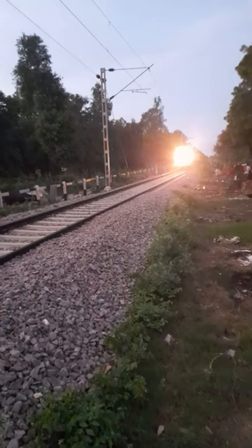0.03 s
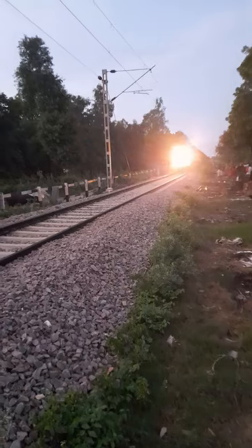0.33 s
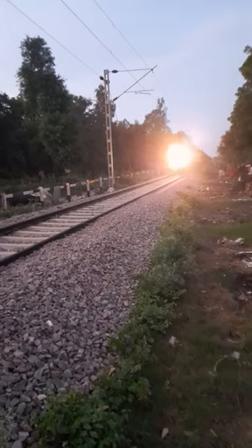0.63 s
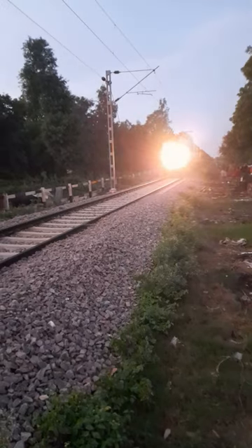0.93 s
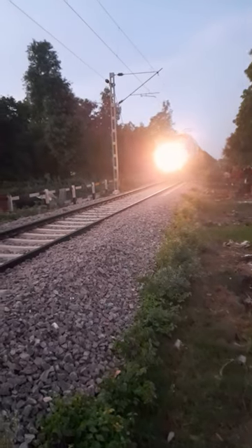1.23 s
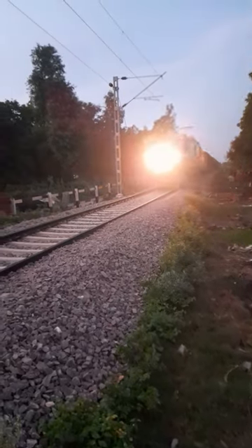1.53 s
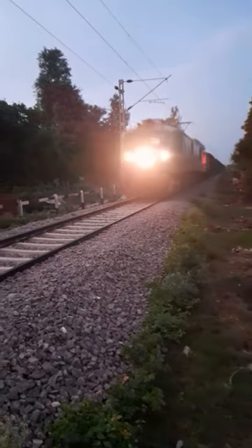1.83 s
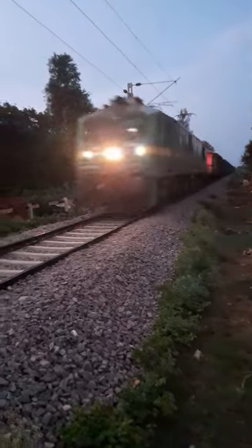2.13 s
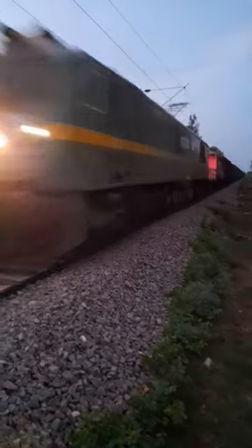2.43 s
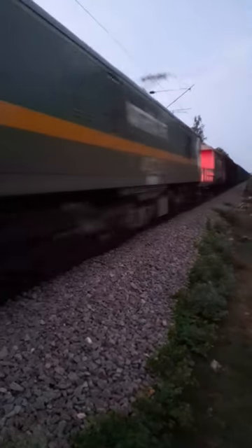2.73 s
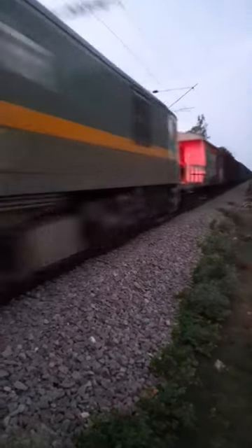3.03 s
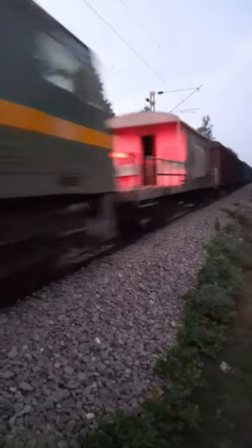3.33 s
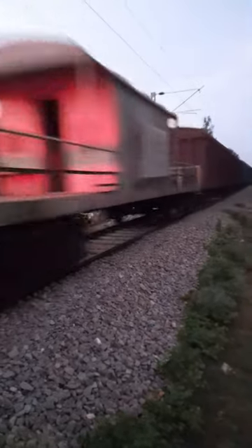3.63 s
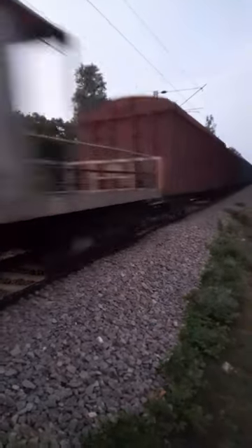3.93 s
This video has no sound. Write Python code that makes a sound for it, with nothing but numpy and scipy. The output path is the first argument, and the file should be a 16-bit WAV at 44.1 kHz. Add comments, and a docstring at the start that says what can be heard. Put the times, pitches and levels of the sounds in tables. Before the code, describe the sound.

A freight train approaches and passes close by, with rumbling, roaring wheels and pinging rails.

```python
"""Beside a straight railway track, an electric freight train comes up and passes a few metres away.
The ground rumbles and throbs first. Then the wheels roar on the rails, and the motors and gears of the
locomotive drone, dropping in pitch as it goes by. The rails ping and sing ahead of the train, a wheel
squeals, and steel scrapes on steel, loudest as the first wagon arrives.
A phone picks it all up through two microphone openings, left and right."""
import sys
import numpy as np
from scipy import signal
from scipy.fft import rfft, irfft
from scipy.io import wavfile
from scipy.ndimage import uniform_filter1d, map_coordinates

SR = 44100
rng = np.random.default_rng(int(sys.argv[2]) if len(sys.argv) > 2 else 0)


def bounce(signal):
    """Save signal as a 16-bit WAV file at the path given by the first command-line argument."""
    frames = np.transpose(np.atleast_2d(signal))
    limited = np.clip(frames, -1, 1)
    pcm = np.round(limited * 32767).astype(np.int16)
    wavfile.write(sys.argv[1], SR, pcm)


N = 176400
T = np.arange(N) / SR
HZ = np.fft.rfftfreq(N, 1 / SR)
NEAR_S, NEAR_SPAN_S = 2.4, 1  # when and how slowly the far sound turns into the near sound

# how the rumble of the ground throbs (time [s], level [dB])
GROUND_LEVEL = [(0.1, -22.5), (0.18, -29.5), (0.26, -31), (0.33, -21.5), (0.41, -35), (0.56, -25),
                (0.6, -32), (0.67, -21), (0.73, -16.5), (0.8, -31), (0.86, -22.5), (1.04, -32.5),
                (1.16, -24.5), (1.25, -27), (1.39, -24), (1.6, -28.5), (1.78, -26.5), (1.86, -26.5),
                (2.03, -28), (2.15, -37), (2.23, -25.5), (2.33, -37), (2.55, -32), (2.85, -30),
                (3.2, -32.5), (3.68, -29.5), (4, -33)]
# how strongly the rails ring (time [s], level [dB])
RAIL_LEVEL = [(0.1, -36.5), (0.38, -34.5), (0.6, -29.5), (1.0, -30), (1.6, -27.5), (2.15, -30),
              (2.7, -28.5), (3.05, -26), (3.3, -30), (3.55, -26.5), (4, -31)]


def amp(db):
    """Turns decibels into a number to multiply by."""
    return 10 ** (np.asarray(db) / 20)


def unit(x):
    """Scales a signal to an average strength (rms) of 1."""
    return x / np.sqrt(np.mean(abs(x) ** 2) + 1e-20)


def spectrum(points):
    """Joins (frequency, value) points into a line over all frequencies, with octaves evenly spaced."""
    hz, value = np.transpose(points)
    return np.interp(np.log(HZ + 1), np.log(hz + 1), value)


def peaks(modes):
    """Makes a narrow peak or dip, in dB, around each listed frequency."""
    return sum(db / (1 + (2 * (HZ - hz) / width_hz) ** 2) for hz, width_hz, db in modes)


def curve(points):
    """Joins (time, value) points into a line over the whole sound."""
    return np.interp(T, *np.transpose(points))


def turn(at_s, span_s):
    """Glides from 0 to 1 around a moment."""
    return .5 + .5 * np.tanh((T - at_s) / span_s)


def arch(start, length):
    """One smooth swell from 0 to 1 and back."""
    return np.sin(np.pi * np.clip((T - start) / length, 0, 1))


def wander(rate_hz):
    """A smooth random wobble; its real and imaginary parts move independently."""
    keep_slow = np.exp(-.5 * (np.fft.fftfreq(N, 1 / SR) / rate_hz) ** 2)
    noise = rng.standard_normal(N) + 1j * rng.standard_normal(N)
    return unit(np.fft.ifft(np.fft.fft(noise) * keep_slow))


def stereo_noise():
    """White noise for left and right, alike in the bass and mostly different in the treble."""
    # how alike the two sides are (frequency [Hz], likeness [0-1])
    likeness = [(60, .98), (150, .94), (400, .83), (950, .7), (2000, .3), (5000, .22), (15000, .25)]
    same = spectrum(likeness)
    a, b = rfft(rng.standard_normal((2, N)))
    mid, side = a * np.sqrt(1 + same), b * np.sqrt(1 - same)
    return unit(irfft([mid + side, mid - side], N))


def colour(x, db):
    """Turns each frequency up or down by db, then scales the result to strength 1."""
    return unit(irfft(rfft(x) * amp(db), N))


def steadied(x):
    """Takes the slow swells out of a noise."""
    return x / np.sqrt(uniform_filter1d((x ** 2).mean(0), 2600) + 1e-12)


def wheel_contact():
    """Wheels touch the rail unevenly: noise with louder and softer patches and a faint flicker."""
    patchy_db, flicker_db = 1.31, -0.13
    grid = signal.stft(stereo_noise(), nperseg=512, noverlap=384)[2]  # side, frequency, time
    patches = uniform_filter1d(rng.standard_normal(grid.shape[1:]), size=6, axis=0)
    patches = unit(uniform_filter1d(patches, size=14, axis=1))
    flicker = unit(uniform_filter1d(rng.standard_normal(grid.shape[2]), size=4))
    grid = grid * amp(patchy_db * patches + flicker_db * flicker)
    return signal.istft(grid, nperseg=512, noverlap=384)[1][:, :N]


def rolling():
    """Rolling wheels shake the ground, their frames and the rails; the tone shifts as they come near."""
    # boom of the wheel frames (time [s], level [dB])
    boom_level = [(0.1, -29.5), (0.36, -32.5), (0.55, -26.5), (0.75, -26), (0.79, -29), (1.08, -27),
                  (1.14, -23.5), (1.33, -22.5), (1.85, -21), (2.05, -26), (2.5, -20.5), (2.8, -19),
                  (2.92, -18), (3.03, -15.5), (3.15, -18), (3.23, -19.5), (3.36, -21.5), (3.48, -16),
                  (3.75, -19.5), (3.92, -18.5), (3.98, -22.5)]
    # roar of the wheels (time [s], level [dB])
    roar_level = [(0.1, -36.5), (0.351, -34), (1.24, -25.5), (1.7, -19.5), (1.82, -21.5), (2.24, -17.5),
                  (2.5, -19.5), (2.7, -13.5), (2.78, -18.5), (3.0, -14), (3.09, -13.5), (3.15, -18.5),
                  (3.24, -18.5), (3.4, -15.5), (3.58, -15.5), (3.75, -21.5), (3.98, -21)]
    # high rushing sound (time [s], level [dB])
    rush_level = [(0.1, -41), (0.4, -39), (0.8, -37.5), (1.5, -34), (2.0, -32.5), (2.4, -32), (2.7, -29),
                  (3.02, -26.5), (3.25, -30), (3.45, -23.5), (3.65, -25), (3.8, -28), (4, -28.5)]
    # tone of the train far away (frequency [Hz], relative level [dB])
    far_tone = [(20, -41), (35, -12), (48, 7), (60, 10), (80, -7.5), (120, -6.5), (175, -7.5), (240, -0.5),
                (320, -13), (410, -9), (470, -4.5), (520, -18.5), (600, -5.5), (670, -6.5), (800, -11.5),
                (960, -13), (1400, -20.5), (1650, -32.5), (2600, -28.5), (3600, -36), (4700, -35),
                (6500, -46.5), (8500, -49.5), (9700, -64.5), (11500, -54), (15000, -66)]
    # tone of the train alongside (frequency [Hz], relative level [dB])
    near_tone = [(20, -37), (35, -22), (55, -1), (85, -11), (130, -3.5), (170, -3.5), (230, 0), (280, -5.5),
                 (470, 9.5), (550, 2.5), (640, 8), (770, -5), (950, -6.5), (1350, -13), (1700, -18),
                 (2500, -13.5), (3300, -23), (4600, -22.5), (6500, -36), (8500, -38.5), (9900, -53),
                 (11500, -47), (15000, -50)]
    # narrow peaks and dips of rails and wheels (frequency [Hz], width [Hz], boost [dB])
    resonances = [(120, 10, 5.5), (181, 19, -3), (324, 33, 1), (766, 44, 6.5), (958, 29, -12),
                  (995, 38, 4.5), (1071, 85, -4.5), (1312, 49, 3.5), (1830, 62, 3), (2012, 33, 5),
                  (2200, 40, 4.5), (2370, 25, -2.5), (3020, 18, 4), (3300, 22, 5.5), (3880, 12, 6),
                  (5170, 34, 2.5)]
    # borders between the five bands: ground, boom, roar, rails, rush (frequency [Hz])
    band_edges = [90, 300, 900, 1600]
    # added to the level of each band (gain [dB])
    band_gains = [-1.25, -1.2, -1.58, -1.34, -0.91]
    contact, near = wheel_contact(), turn(NEAR_S, NEAR_SPAN_S)
    ringing_db = peaks(resonances)
    below = [0] + [1 / (1 + (HZ / edge) ** 16) for edge in band_edges] + [1]
    out = 0
    for k, level in enumerate([GROUND_LEVEL, boom_level, roar_level, RAIL_LEVEL, rush_level]):
        band_db = 10 * np.log10(abs(below[k + 1] - below[k]) + 1e-12) + ringing_db
        far_sound = colour(contact, band_db + spectrum(far_tone))
        near_sound = colour(contact, band_db + spectrum(near_tone))
        blend = steadied((1 - near) * far_sound + near * near_sound)
        out = out + blend * amp(curve(level) + band_gains[k])
    return out


def ground_hum():
    """The ground carries the far locomotive's low note; it throbs, then fades as the train arrives."""
    hum_hz, waver_hz, over_rumble_db = 59.4, 2.99, -4
    pitch = hum_hz + waver_hz * unit(wander(6.04).real)
    cycles = np.cumsum(pitch) / SR + rng.random()
    far = 1 - turn(NEAR_S, NEAR_SPAN_S)
    return unit(np.sin(2 * np.pi * cycles)) * amp(curve(GROUND_LEVEL) + over_rumble_db) * far


def rail_singing():
    """The rail's own high notes ring in short bursts, wavering differently on the left and right."""
    # notes the rail rings at (pitch [Hz], relative level [dB])
    rail_notes = [(4247, -6), (6901, -11), (8280, -4), (8380, -13), (10400, -21), (12030, -19),
                  (14400, -14)]
    # bursts of singing (start [s], length [s], level [dB])
    bursts = [(0.05, 0.21, -46), (0.73, 0.1, -51), (1.22, .06, -55), (1.48, .08, -46), (2.1, 0.16, -55)]
    waver_hz, rest_db = 28, -69
    notes = 0
    for hz, db in rail_notes:
        waver = wander(58)
        pitch = hz + waver_hz * np.array([waver.real, waver.imag])
        cycles = np.cumsum(pitch, axis=1) / SR + rng.random((2, 1))
        notes = notes + amp(db) * np.sin(2 * np.pi * cycles)
    swells = sum(amp(db) * arch(start, length) for start, length, db in bursts)
    return notes * (amp(rest_db) + swells)


def rail_pings():
    """Knocks run through the rail and arrive as short falling chirps, faint ones among the loud ones."""
    # the loud pings (time [s], peak level [dB], pitch before tuning [Hz])
    loud_pings = [(0.166, -20, 1080), (0.589, -19.5, 980), (0.668, -12.5, 1130), (0.679, -19, 1160),
                  (1.271, -18, 1040), (2.0, -12, 690), (2.038, -16, 793), (2.176, -6.5, 700),
                  (2.264, -5.5, 976), (2.271, -13, 1060), (2.316, -13.5, 940), (2.536, -13, 746),
                  (3.067, -19, 780)]
    rise_s, fall_s, overshoot, tuning = 0.0025, 0.0013, 0.49, 0.952
    faint_per_s, over_rails_db = 10, -1.5
    faint_db = curve(RAIL_LEVEL) + over_rails_db
    draws = rng.random((int(faint_per_s * N / SR), 3)) * [T[-1], 1, 1]
    faint_pings = [(start, faint_db[int(start * SR)] + 6 * (size - .5), 750 + 650 * height)
                   for start, size, height in draws]
    t, out = np.arange(SR // 30) / SR, np.zeros(N)
    envelope = (t / rise_s * np.exp(1 - t / rise_s)) ** 2
    for start, db, hz in list(loud_pings) + faint_pings:
        pitch = hz * tuning * (1 + overshoot * np.exp(-t / fall_s))
        ping = envelope * np.sin(2 * np.pi * np.cumsum(pitch) / SR)
        slot = out[round(start * SR):][:len(t)]
        slot += amp(db) * ping[:len(slot)]
    return out


def motor_drone():
    """Rough notes of motors and gears swell, and drop in pitch as they pass (the Doppler effect)."""
    # the notes (loudest at [s], swell time [s], pitch when level with us [Hz], level [dB], rough [0-1])
    motor_notes = [(0.75, 0.086, 237, -28.5, 0.35), (1.4, 1, 636, -34.5, 0.87),
                   (2.31, 0.17, 462, -21.5, 0.51), (2.42, 0.35, 637.5, -21.5, .6),
                   (2.66, 0.21, 233.9, -22, 0.42), (2.67, .1, 325.5, -25.5, 0.2),
                   (2.92, 0.061, 230, -12.5, 0), (3.101, 0.13, 611.7, -22.5, .4),
                   (3.32, 0.13, 657, -21.5, 0.63), (3.42, 0.12, 238, -14.5, 0.21),
                   (3.68, 0.17, 634, -19.5, 0.58)]
    doppler_share, waver_hz, breakup_hz = .035, 3.5, 11.7
    shift = 1 + doppler_share * (1 - 2 * turn(at_s=3.15, span_s=0.3463))
    out = 0
    for at_s, span_s, hz, db, rough in motor_notes:
        pitch = hz * shift + waver_hz * unit(wander(7.05).real)
        cycles = np.cumsum(pitch) / SR + rng.random()
        note = np.exp(2j * np.pi * cycles) * (1 - rough + rough * wander(breakup_hz))
        swell = np.exp(-((T - at_s) / span_s) ** 2)
        out = out + unit(note.real) * amp(db) * swell
    return out


def scrape(strokes, hiss, modes):
    """Steel rubs on steel: a hiss that starts quickly, can make the metal ring, and fades."""
    friction, out = stereo_noise(), 0
    for start, rise, fade, db, ring in strokes:
        attack = np.clip((T - start) / rise, 0, 1)
        decay = amp(db - fade * np.maximum(T - start - rise, 0))
        out = out + attack * decay * colour(friction, spectrum(hiss) + ring * peaks(modes))
    return out


def far_scrapes():
    """Steel scrapes thinly while the train is still some way off."""
    # the scrapes (start [s], rise [s], fade [dB per s], level [dB], ring [0-1])
    strokes = [(1.536, 0.011, 150, -35, 1), (1.61, 0.08, 24, -48, 0), (1.692, .01, 130, -41, .8),
               (1.76, .08, 90, -47.5, 0)]
    # tone of their hiss (frequency [Hz], relative level [dB])
    hiss = [(100, -29), (3000, -10), (5500, 6), (6600, 0.5), (7500, 0.5), (9000, 1), (10000, -11),
            (11300, 3), (14000, -3.5), (15500, -11)]
    # where the steel rings (frequency [Hz], width [Hz], boost [dB])
    steel_notes = [(7450, 500, 10), (8020, 360, 13)]
    return scrape(strokes, hiss, steel_notes)


def wheel_squeal():
    """A wheel gives a short fuzzy whistle, made of a narrow band of noise."""
    # when it squeals (start [s], length [s])
    timing = (1.79, .2)
    pitch_hz, width_hz, level_db = 5300, 560, -39.5
    band_db = -20 * np.log10(1 + (2 * (HZ - pitch_hz) / width_hz) ** 2)
    return amp(level_db) * arch(*timing) * colour(stereo_noise(), band_db)


def flange_scrape():
    """Close by, the lip of a wheel (its flange) scrapes the rail and the wheel rings."""
    # the scrapes (start [s], rise [s], fade [dB per s], level [dB], ring [0-1])
    strokes = [(3.456, 0.006, 100, -19.5, 0.55), (3.472, 0.025, 400, -23.5, 1)]
    # tone of their hiss (frequency [Hz], relative level [dB])
    hiss = [(1000, -20), (2300, 4), (3000, 3.5), (4000, 4), (5500, 0.5), (7000, -8), (8500, -7),
            (10000, -19.5), (11500, -9.5), (14000, -10), (15500, -18)]
    # where the wheel rings (frequency [Hz], width [Hz], boost [dB])
    wheel_notes = [(2250, 70, 5), (2430, 60, 5), (3790, 75, 13), (4260, 70, 5), (5210, 100, 9),
                   (7660, 110, 9), (9500, 150, 5)]
    return scrape(strokes, hiss, wheel_notes)


def scene():
    """All the sounds together, swinging from one side to the other as the train passes."""
    train = rolling() + ground_hum() + rail_singing() + rail_pings() + motor_drone()
    train = train + far_scrapes() + wheel_squeal() + flange_scrape()
    side_delay_ms = 0.13  # the most that one side hears the train before the other
    lag = side_delay_ms * SR / 1000 * (turn(at_s=2.67, span_s=0.34) - .5)
    return np.array([map_coordinates(channel, [np.arange(N) + side * lag], order=5, mode="nearest")
                     for channel, side in zip(train, (-1, 1))])


def record(dry):
    """The microphone colours each side, switches on just after the start and cuts the highest treble."""
    # balance of the two sides (frequency [Hz], left minus right [dB])
    balance = [(30, 0), (60, 0), (130, -0.5), (230, -0.5), (450, -2), (750, -0.4), (1200, -2.3),
               (2400, -3.7), (4200, -4), (6000, 0.5), (7600, 20), (9000, 15), (10800, -2), (14900, 0)]
    on_s, rise_s, top_hz = 0.084, 0.016, 15400
    gains = amp(spectrum(balance) * np.array([[.5], [-.5]]))
    sound = irfft(rfft(dry) * gains / np.sqrt((gains ** 2).mean(0)), N)
    sound = sound * np.clip((T - on_s) / rise_s, 0, 1)
    treble_cut = signal.firwin(511, top_hz, window=("kaiser", 9), fs=SR)
    return signal.oaconvolve(sound, treble_cut[None], "same")


dry = scene()
out = record(dry)
bounce(out)
```